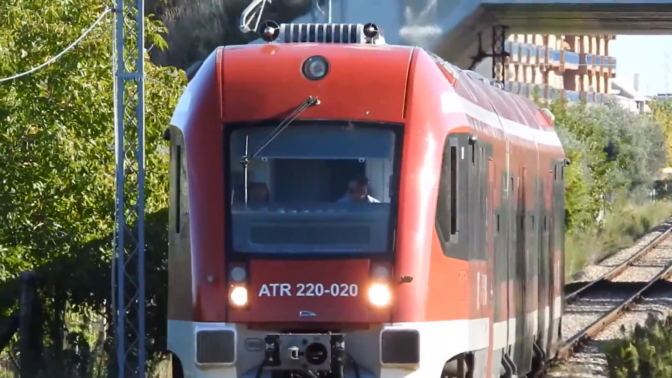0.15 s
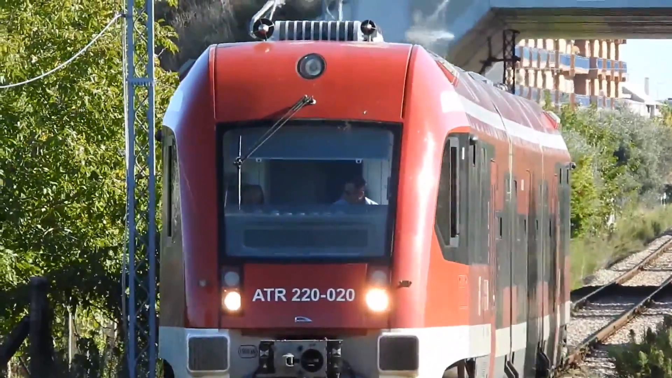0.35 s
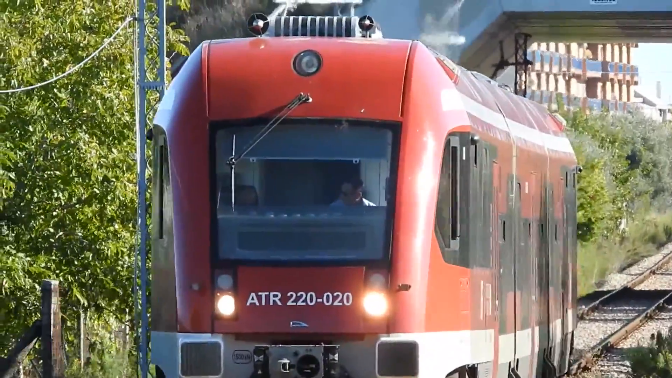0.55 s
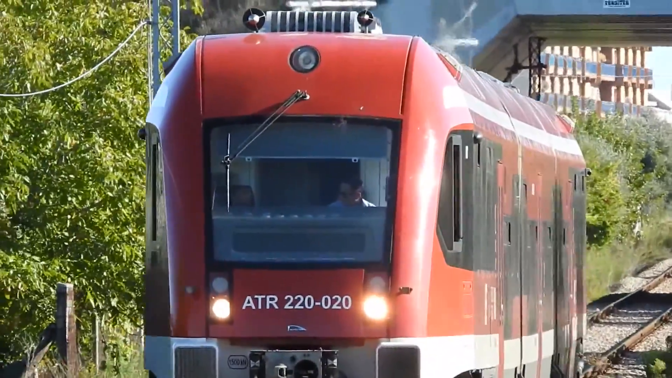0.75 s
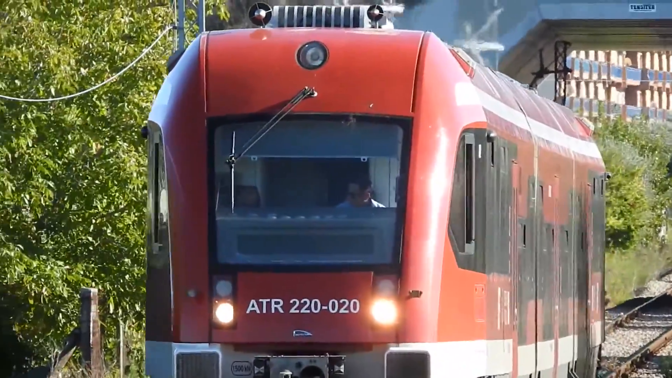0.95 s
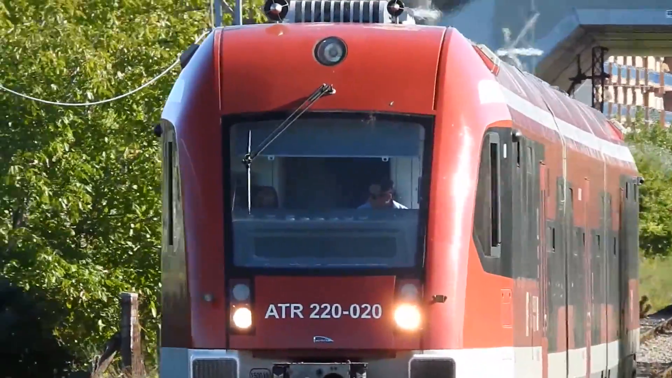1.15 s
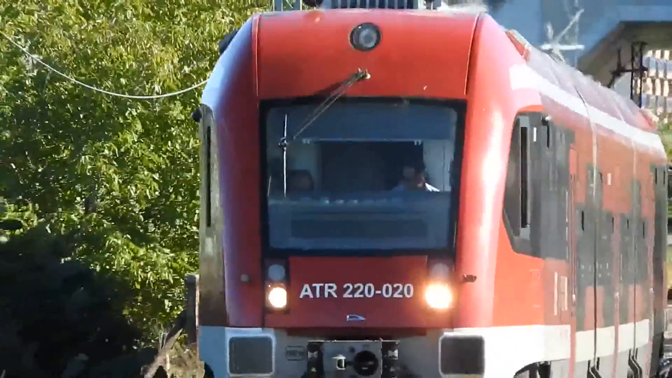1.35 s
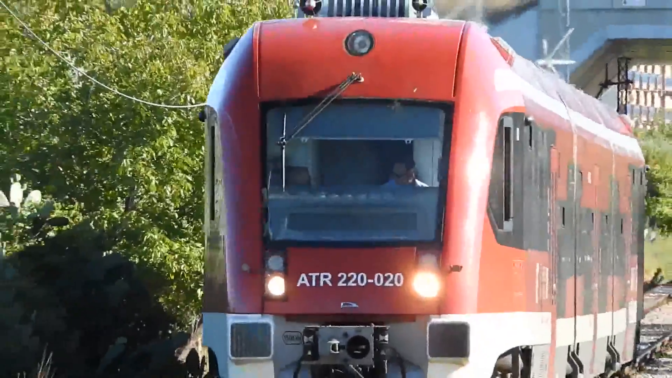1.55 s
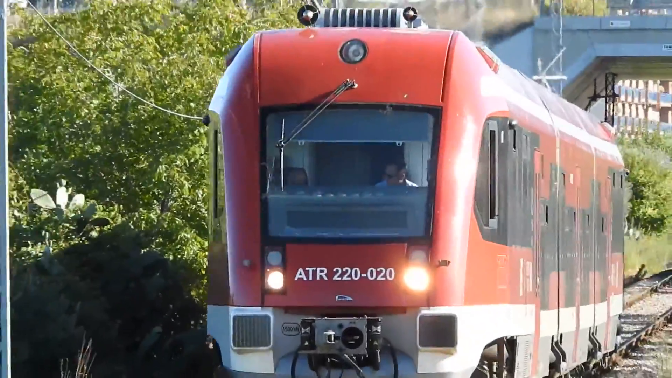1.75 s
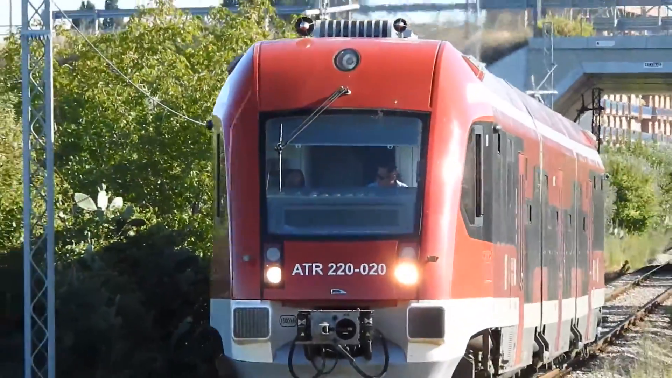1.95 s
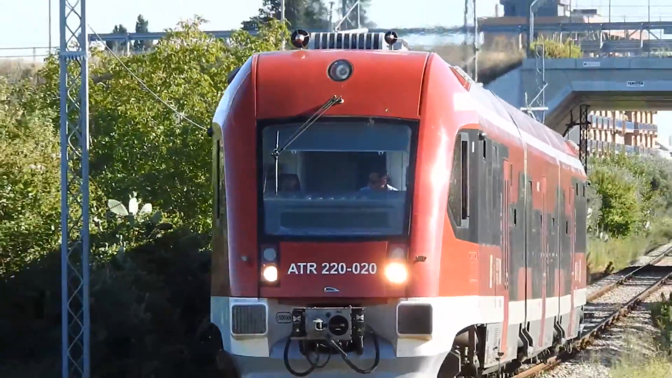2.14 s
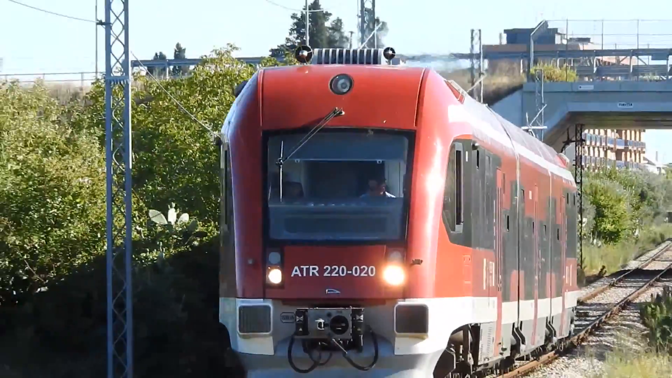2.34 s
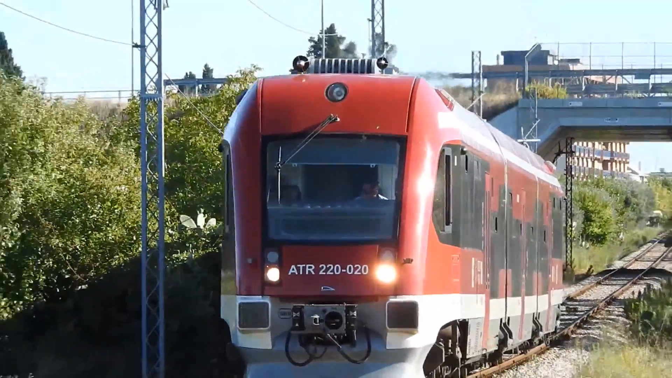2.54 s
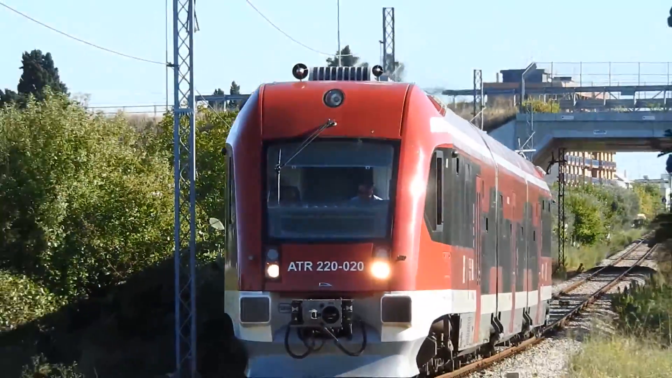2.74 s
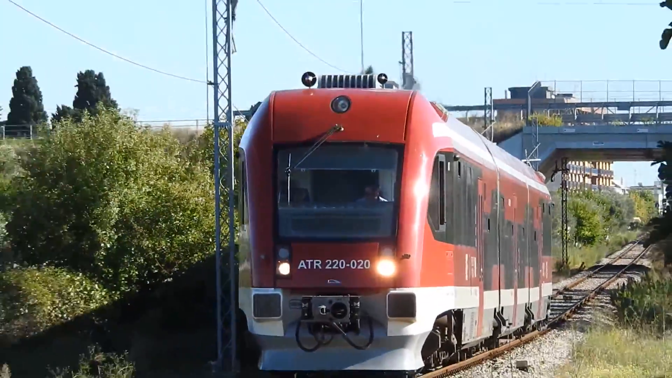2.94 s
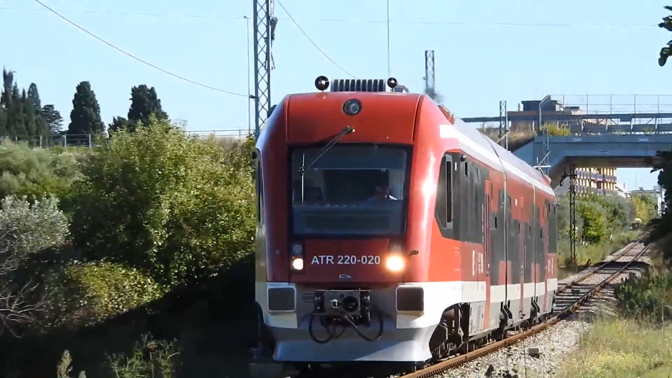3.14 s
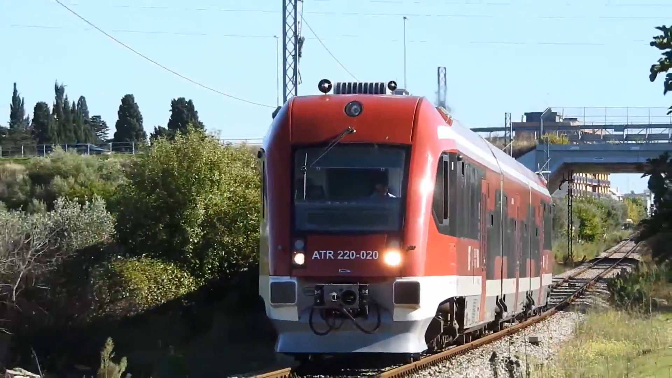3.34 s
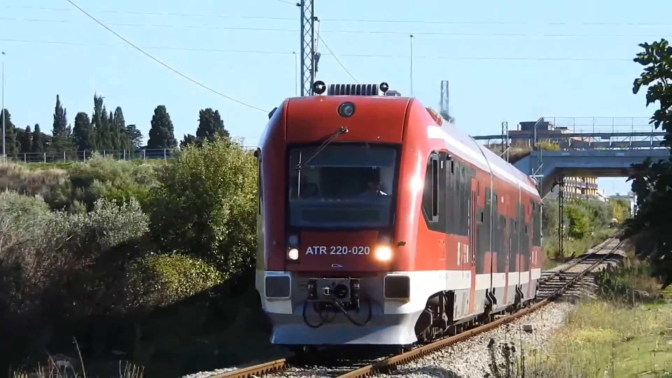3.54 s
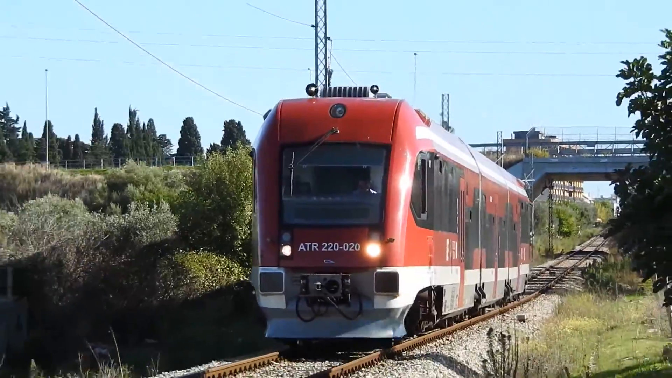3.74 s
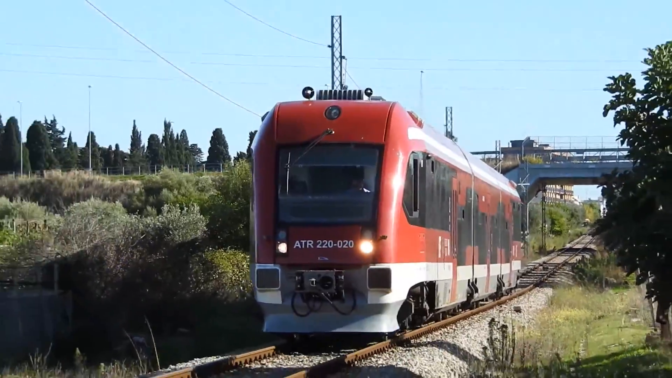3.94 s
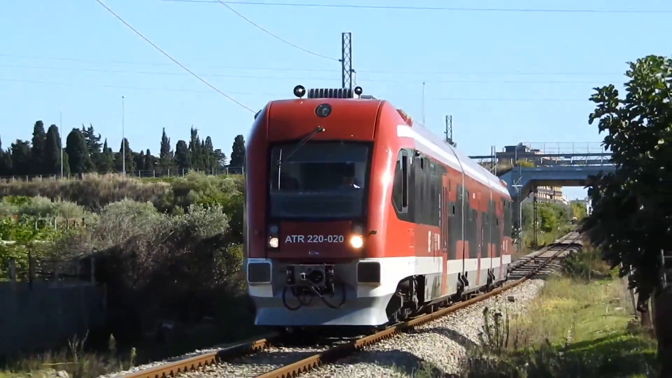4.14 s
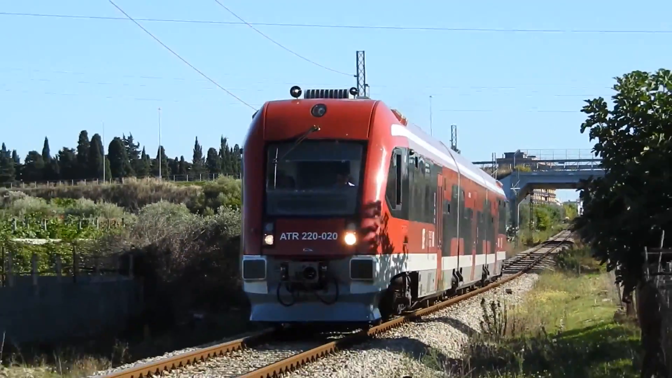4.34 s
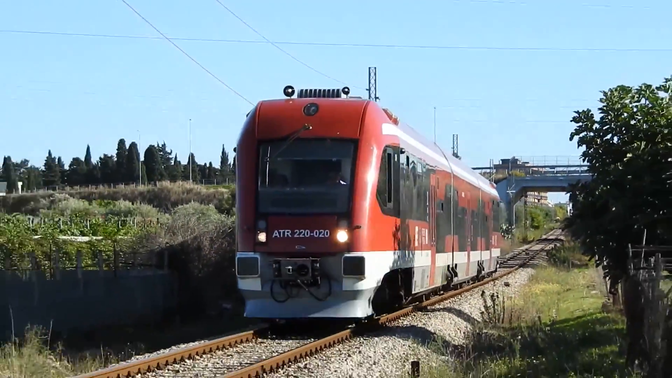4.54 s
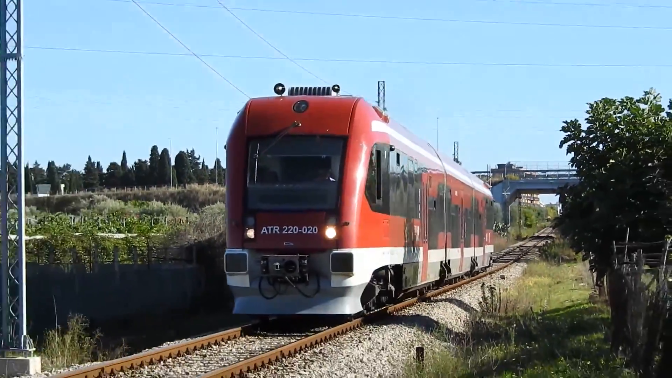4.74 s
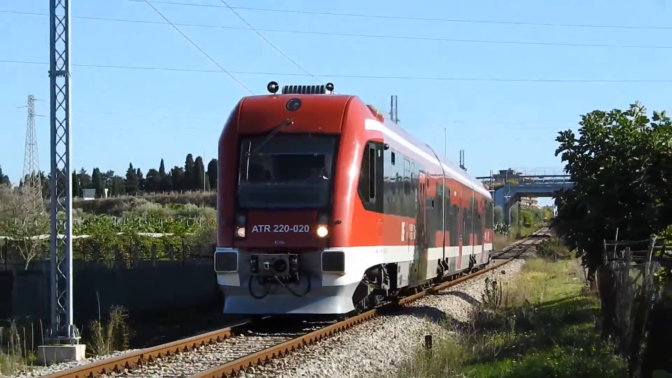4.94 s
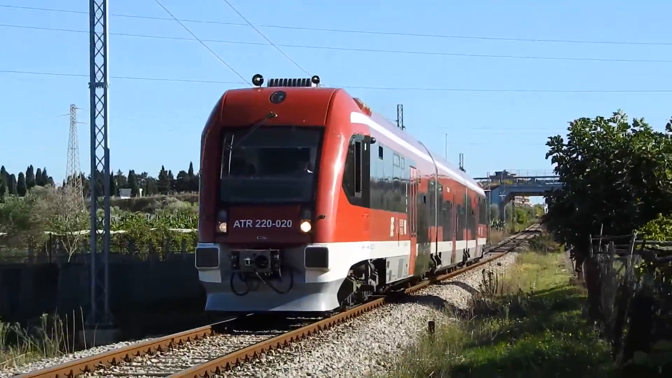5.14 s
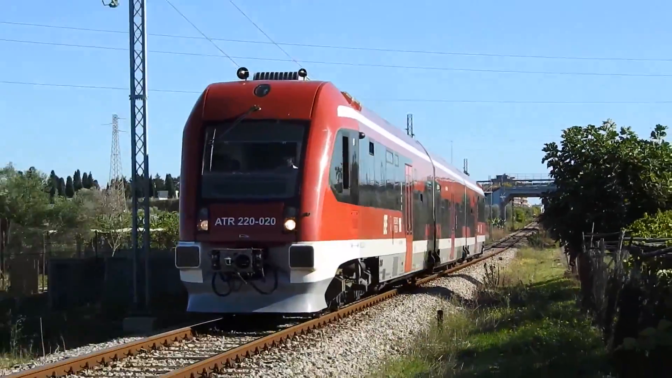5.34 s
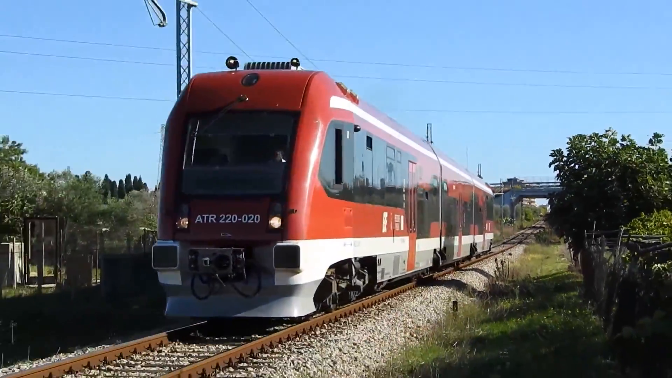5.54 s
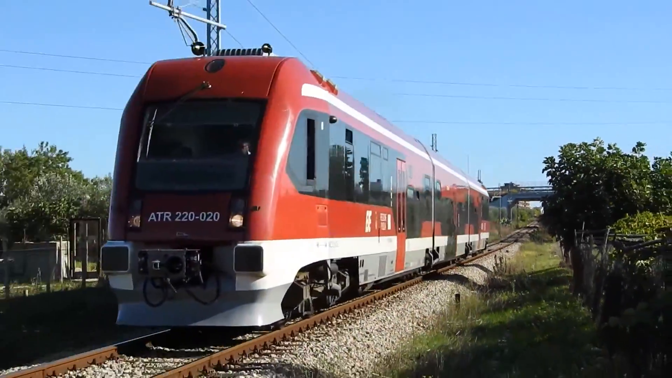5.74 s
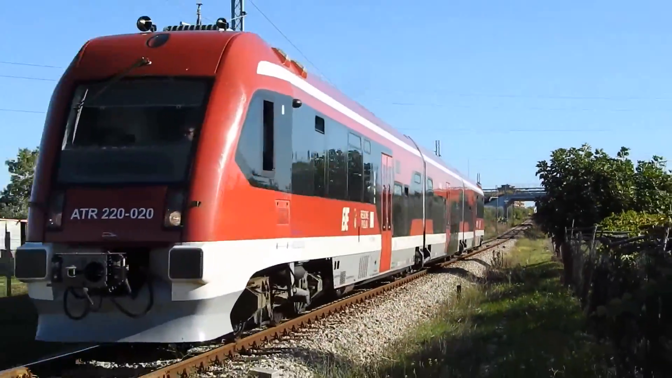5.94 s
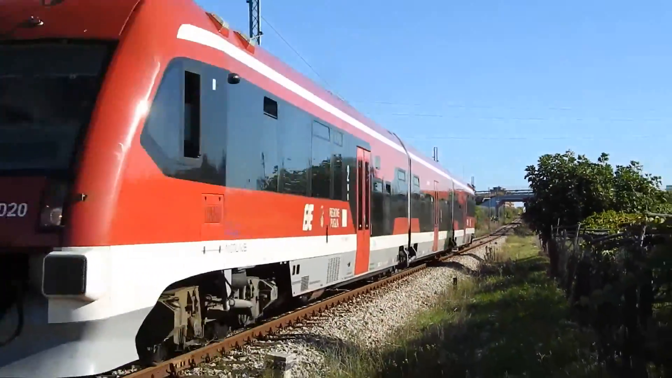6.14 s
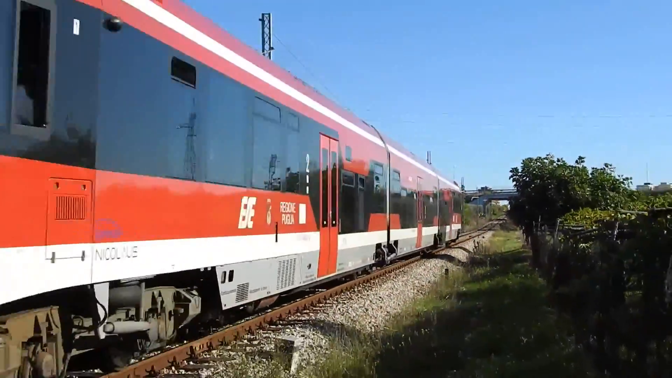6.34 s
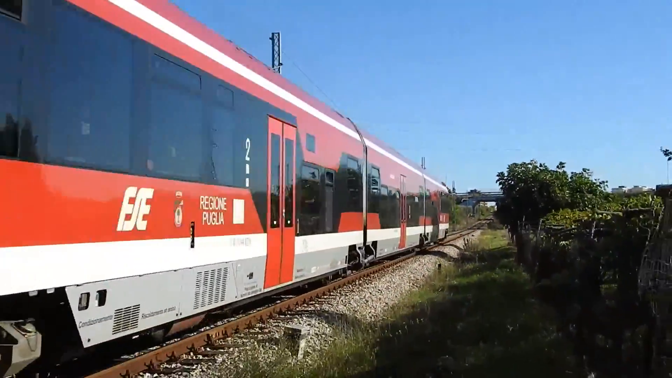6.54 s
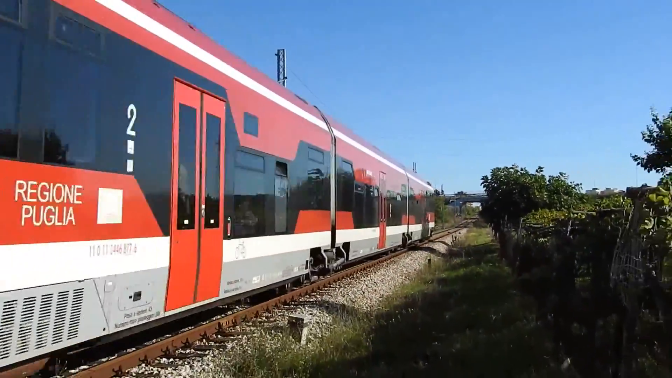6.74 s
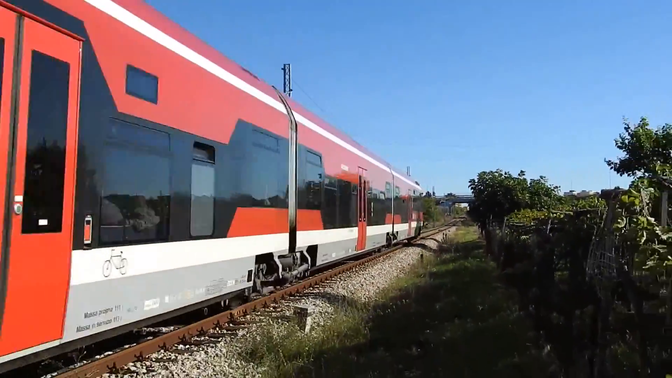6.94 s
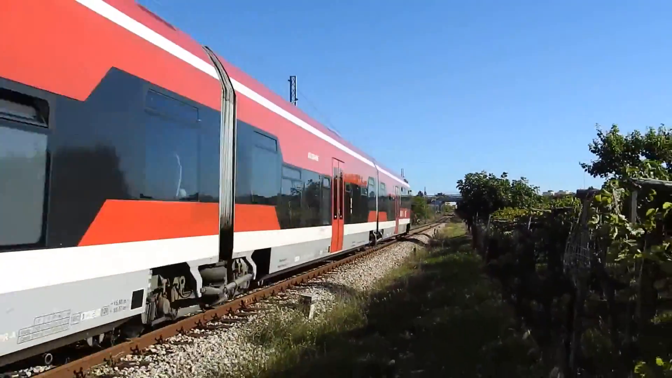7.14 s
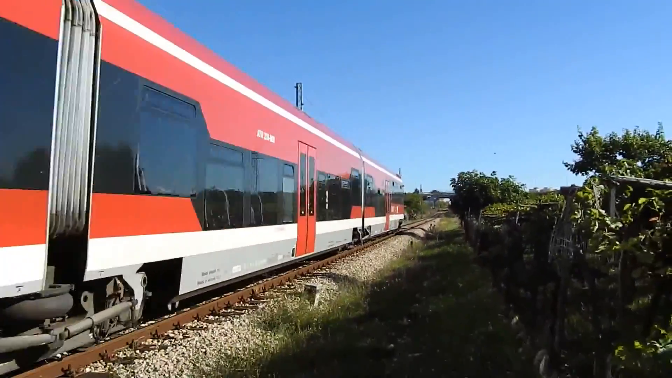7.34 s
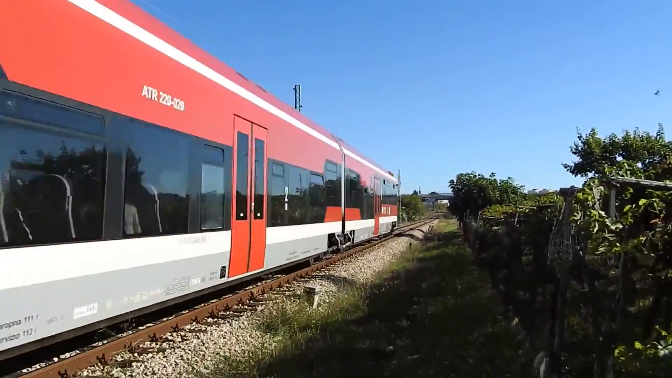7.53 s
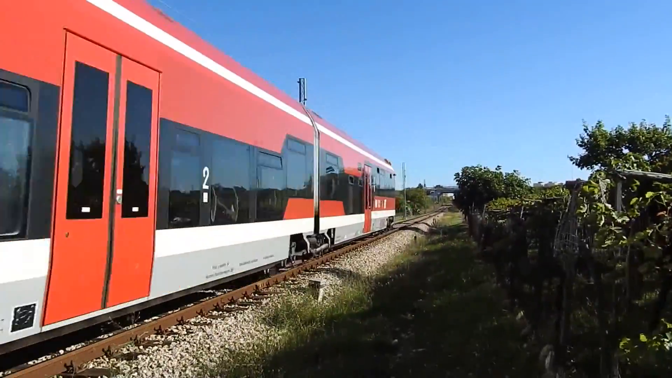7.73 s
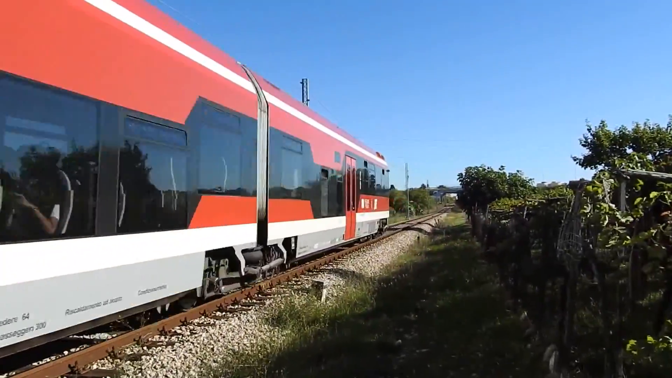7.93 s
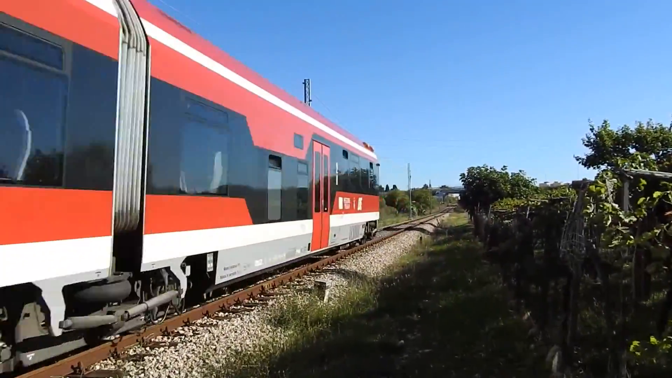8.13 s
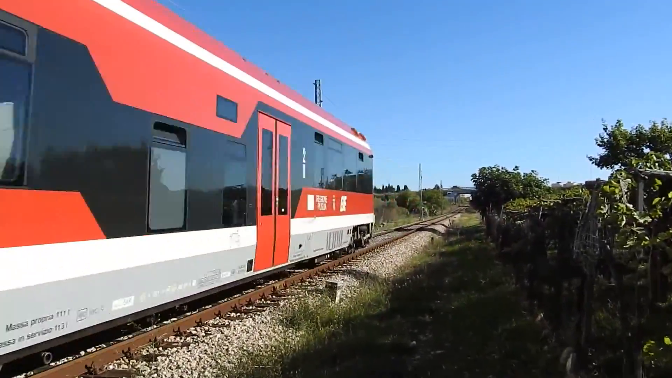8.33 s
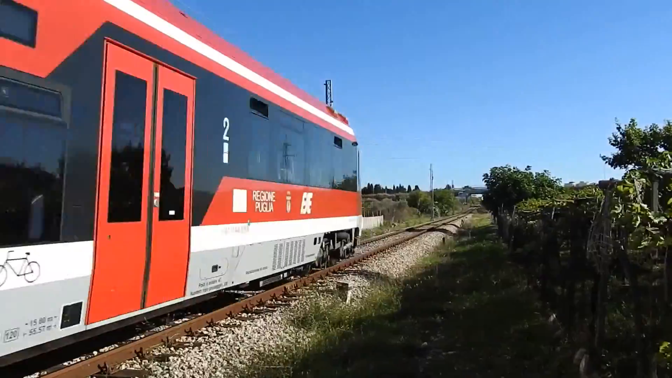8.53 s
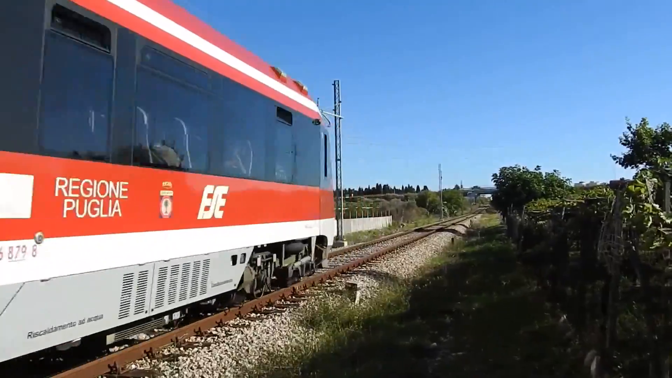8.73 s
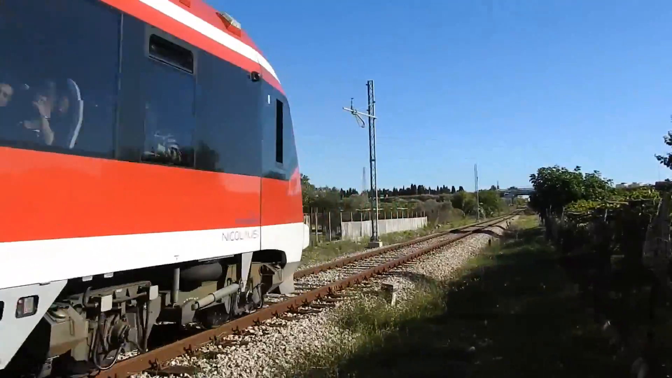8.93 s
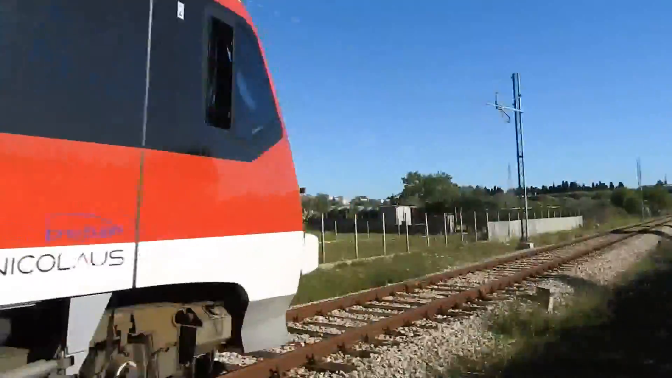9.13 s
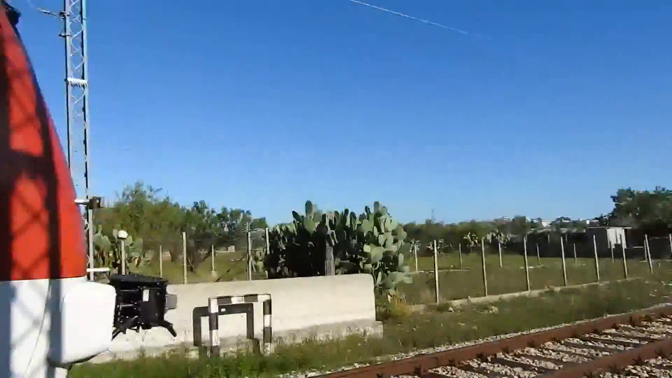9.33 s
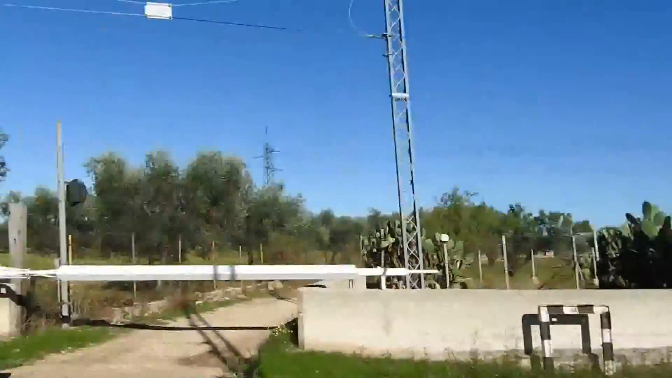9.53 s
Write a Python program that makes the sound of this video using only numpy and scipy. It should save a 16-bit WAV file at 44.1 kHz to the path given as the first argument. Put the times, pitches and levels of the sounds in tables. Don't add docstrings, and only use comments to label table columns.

```python
import sys
import numpy as np
from scipy import signal
from scipy.fft import rfft, irfft, next_fast_len
from scipy.io import wavfile
from scipy.ndimage import uniform_filter1d

SR = 44100
rng = np.random.default_rng(int(sys.argv[2]) if len(sys.argv) > 2 else 0)


def put_to_file(sound):
    columns = np.atleast_2d(sound).T
    safe = np.clip(columns, -1, 1)
    whole_steps = np.round(safe * 32767)
    wavfile.write(sys.argv[1], SR, whole_steps.astype(np.int16))


N = 426888

# start_s, nearness (0-1), how far round to the side (0-1), top_edge_hz of the heard band
APPROACH = [(0, 0, 0.7, 11400), (3.3, 0.18, 0.15, 11550), (4.3, 0.45, 0, 11900), (5, 0.5, 0, 12150),
            (6.2, 0.78, 0, 12200), (6.77, 0.86, 0.38, 12330), (6.95, 1, 0.98, 11700),
            (8.5, 0.84, 0.83, 11460), (9.2, 1, 0.94, 11100), (9.68, 1, 0.9, 10800)]
# start_s, left_minus_right_db
PAN_CURVE = [(0.0, 2.5), (5.72, 1), (6.95, 6), (9.35, 5), (9.68, 8)]


def gain_of(db):
    return np.exp(np.asarray(db) * (np.log(10) / 20))


def evened(x):
    return x / np.sqrt(np.mean(x ** 2) + 1e-20)


def read(points, hz):
    f, value = np.transpose(points)
    return np.interp(np.log(hz + 1), np.log(f + 1), value)


def columns(rows, t):
    s, *values = np.transpose(rows)
    return [np.interp(t, s, v) for v in values]


def resonate(x, hz, width):
    turn = np.exp(2j * np.pi * np.cumsum(hz * np.ones(len(x))) / SR)
    r = np.exp(-np.pi * width / SR)
    return 2 * (turn * signal.lfilter([1 - r], [1, -r], x / turn + 1e-18)).real


def wander(rate_hz):
    t = np.arange(0, N + 256, 256) / SR
    rates = np.geomspace(rate_hz / 8, rate_hz, 24)
    waves = sum(np.sin(2 * np.pi * (f * t + rng.random())) for f in rates)
    return np.interp(np.arange(N) / SR, t, evened(waves))


def add(mix, s, sound):
    part = mix[:, round(s * SR):][:, :sound.shape[1]]
    part += sound[:, :part.shape[1]]


def passing(rows, t, steady_db, axis=0):
    focus = 1.74
    s, reach, *levels = np.transpose(rows)
    swell = (1 + ((t[:, None] - s) / reach) ** 2) ** -focus @ gain_of(2 * levels[axis])
    return 10 * np.log10(swell + gain_of(2 * steady_db))


def bell_bursts(rows, length_s, late_s=0, trim_db=0):
    out, t = np.zeros((2, N)), np.arange(-2500, 2500) / SR
    for s, db, hz in rows:
        pan_db = 1.35 * columns(PAN_CURVE, s)[0]
        sides = gain_of([[pan_db / 2], [-pan_db / 2]])
        bell = np.sin(2 * np.pi * hz * t) * np.exp(-(t / length_s) ** 2 / 2)
        add(out, s + late_s + t[0], gain_of(db + trim_db) * sides / sides.mean() * bell)
    return out


def exhaust():
    # start_s, firing_pitch_hz
    firing_curve = [(0, 92.4), (.5, 93), (3.0, 93), (3.35, 93.7), (3.7, 96.6), (4.05, 100.2), (4.4, 103.1),
                    (4.75, 104.3), (5.4, 105.4), (6.85, 105.2), (7.2, 100.6), (7.5, 95.6), (7.95, 95.8),
                    (8.3, 93.5), (8.6, 98), (8.95, 95.4), (9.3, 87), (9.68, 83)]
    # start_s, level_db
    hum_curve = [(0.0, -42), (0.3, -28.5), (2.3, -31.5), (2.9, -25), (3.5, -23.5), (4.0, -21.5),
                 (4.5, -17.5), (5.0, -13), (6.2, -11), (6.3, -18), (6.75, -25.5), (7.15, -16.5),
                 (7.6, -23.5), (8.2, -25), (8.5, -32.5), (8.9, -25.5), (9.13, -31.5), (9.68, -46)]
    # multiple of the firing pitch, far_db, near_db
    orders = [(.667, -45, -40), (.833, -48, -46), (1.333, -54, -36), (1.5, -55, -38), (1.667, -39.5, -31),
              (2.0, -52, -28), (2.5, -60, -33), (2.75, -58, -42), (4.0, -58, -40), (7.9, -66, -35)]
    # start_s, strength of the weaker one (0-1)
    cancellations = [(3.04, 0.16), (4.1, 0.1), (4.31, 0.5), (4.5, 0.34), (4.71, 0.54), (4.97, 0.35),
                     (5.39, 0.26), (5.95, 0.36), (6.8, 0.18), (7.45, 0.2), (8.11, 0.2), (8.57, 0.4),
                     (8.72, 0.6), (9.22, 0.7), (9.63, 0.4)]
    t = np.arange(N) / SR
    hz, level_db = columns(firing_curve, t) + columns(hum_curve, t)
    near, aside, _ = columns(APPROACH, t)
    cycle = 2 * np.pi * np.cumsum(hz * (1 + 0.0023 * wander(6))) / SR
    weaker, turns = columns([(s, share, k) for k, (s, share) in enumerate(cancellations)], t)
    beating = t > cancellations[0][0] - 0.1
    beat = 1 - np.clip(weaker, 0, 0.9) * np.cos(2 * np.pi * turns) * beating
    tone = gain_of(level_db + 1.4 * wander(17)) * beat * np.cos(cycle)
    for k, far_db, near_db in orders:
        order_db = far_db + near * (near_db - far_db) - 12.0 * aside * near + 1.4 * wander(8)
        tone = tone + gain_of(order_db) * np.cos(k * cycle + k)
    lean_db = 0.86 * near - 0.46
    return np.sqrt(2) * tone * gain_of([[1], [-1]] * lean_db)


def running_gear():
    # start_s, wheels_db, nearest_engine_db
    closeness = [(0, -23.5, -29), (1.3, -22.5, -27), (2.75, -21.5, -23), (3.64, -16, -17), (5, -5.5, -8.5),
                 (5.6, -2, -5.5), (6.1, 2.5, 0), (7.06, -0.5, 0), (7.4, -2, -10.5), (7.8, -2, -17),
                 (8.3, 0.5, -16.5), (8.8, 1.5, -9), (9.35, -0.5, -2.5), (9.68, -4, -8)]
    # start_s, reach_s, level_db
    ground_thumps = [
        (1.3, 0.13, -37),
        (5.4, 0.99, -33),
        (6.14, 0.049, -25),
        (6.25, 0.028, -22),
        (9.0, 0.18, -26.5),
        (9.17, 0.038, -28),
    ]
    # start_s, reach_s, level_db
    panel_drums = [(4.6, 0.96, -31.5), (6.12, 0.023, -19), (6.25, 0.025, -18), (6.54, 0.035, -15),
                   (6.69, 0.14, -17), (7.38, 0.051, -22.5), (7.55, 0.12, -21.5), (7.71, 0.017, -23),
                   (8.33, 0.15, -18), (8.48, 0.03, -18), (9.18, 0.19, -16.5), (9.68, 0.13, -20)]
    # start_s, reach_s, roar_db, hiss_db
    axle_passes = [(1.345, 0.013, -49, -55), (5.5, 0.09, -39, -44), (6.1, 0.087, -29, -41),
                   (6.258, 0.015, -18, -53), (6.69, 0.064, -34, -32.5), (7.04, 0.2, -24, -32.5),
                   (7.7, 0.18, -30.5, -36), (7.92, 0.041, -23.5, -38), (8.5, 0.14, -31.5, -34),
                   (8.76, 0.035, -23.5, -50), (9.19, 0.4, -22, -30.5)]
    # start_s, reach_s, level_db
    louvres = [
        (6.14, .07, -34.5),
        (6.67, .05, -37),
    ]
    # freq_hz, density_db
    rumble_ahead = [(20, -50), (48, -44), (65, -15), (85, 8.5), (125, -6), (160, 3), (210, 2), (250, -35),
                    (330, -62.5)]
    rumble_aside = [(20, -42), (40, -38), (65, -6), (85, 0), (125, -24), (160, 3), (200, -0.5), (250, -24),
                    (330, -70)]
    drum_colour = [(200, -15), (250, -4), (310, -3.5), (345, -1), (385, -1.5), (450, -5.5), (540, -10),
                   (680, -43.5)]
    roll_far = [(280, -38), (480, -10), (714, -5), (820, -6), (1070, -8.5), (1160, -14), (1900, -11),
                (2470, -37), (4180, -120)]
    roll_near = [(280, -36), (480, -8), (545, -27), (601, 1.5), (702, -2), (839, -5), (1200, -6),
                 (1390, -8), (1900, -33), (2470, -31), (4180, -120)]
    roll_aside = [(280, -43), (480, -17), (554, 0), (770, -5), (1130, -8), (1530, -16.5), (1900, -33),
                  (2470, -49), (4180, -120)]
    hiss_far = [(880, -22), (1500, -2.5), (2090, -1.5), (2290, -4.5), (2500, -3.5), (2860, -2.5),
                (3530, -5), (4040, -3.5), (4990, -10.5), (7600, -11.5), (9880, -63), (16700, -120)]
    hiss_near = [(880, -2), (1500, 0), (2010, -2), (2460, -1.5), (3550, -5.5), (4040, -3.5), (7600, -10.5),
                 (9880, -40), (16700, -120)]
    rush_far = [(4240, -14), (7200, -0.5), (8210, -6), (9260, -4), (10400, 0), (10900, -3.5), (11500, -12),
                (12500, -28), (16200, -52), (22000, -120)]
    rush_near = [(5500, -5.5), (7200, -3), (8500, 0.5), (9500, 1.5), (11000, -0.5), (13000, 9)]
    # pitch_hz, width_hz,
    # far_db, near_db
    whine_lines = [(829, 35, 0, 6), (940, 80, 5, 5), (1300, 28, 9, 0), (2250, 32, 11, 1), (2480, 200, 1, 5),
                   (2680, 35, 6, 2), (2920, 50, 3, 0), (3970, 60, 5.5, 1), (6630, 55, 8, 1),
                   (8850, 70, 6.5, 0), (10120, 60, 5, 0), (10600, 130, 4, 4), (11010, 40, 4, 0)]
    # start_s, reach_s, pitch_hz, over_hiss_db
    web_songs = [
        (7.35, .05, 2650, 5),
        (7.87, .06, 2400, 7),
        (8.37, .06, 3350, 5),
        (8.5, .08, 4150, 4),
        (8.72, .09, 2350, 6),
        (8.87, .05, 2400, 7),
        (9.18, .08, 2350, 3.5),
        (9.2, .07, 2700, 4.5),
        (9.35, .09, 3100, 7),
        (9.5, .07, 3080, 7),
    ]
    # freq_hz, coherence (negative = out of step)
    likeness_ahead = [(60, 0.92), (270, 0.92), (580, 1), (1700, 0.89), (2400, 0.74), (4400, 0.78),
                      (6800, 0.49), (8600, 0.53), (12000, 0.4)]
    likeness_aside = [(60, 1), (270, 0.94), (1000, 0.88), (2400, 0.54), (4400, 0.51), (6500, 0.1),
                      (8300, 0.52), (12000, 0.51)]
    # freq_hz, share of the pan
    pan_share = [(60, 0), (150, 0.098), (350, 1.34), (1150, 1.36), (4000, 1.46), (12000, 0.37)]
    # freq_hz, left_lead_rad
    side_lead = [(1000, .05), (3200, .65), (3700, .6), (4130, -.3), (5940, -.9), (7320, -3), (12000, -3.1)]

    frames, hz = N // 256 + 5, np.fft.rfftfreq(1024, 1 / SR)
    t = np.arange(frames) * 256 / SR
    wheels, engine = columns(closeness, t)
    pan_db = columns(PAN_CURVE, t)[0]
    near, aside, _ = columns(APPROACH, t)

    rumble_db = passing(ground_thumps, t, -26.5 + 0.76 * wheels)
    drum_db = passing(panel_drums, t, -25 + 1.59 * wheels)
    roll_db = passing(axle_passes, t, -28 + wheels)
    bay_power = gain_of(2 * (-34 + 0.71 * engine)) + gain_of(2 * (-39.5 + wheels))
    hiss_db = passing(axle_passes, t, 10 * np.log10(bay_power), axis=1)
    rush_db = passing(louvres, t, -36 + engine)

    def blend(far, close, nearness=near):
        return read(far, hz)[:, None] * (1 - nearness) + read(close, hz)[:, None] * nearness

    def layer(colour_db, level_db, lo_hz, hi_hz):
        power = gain_of(2 * colour_db)
        return power / power[(hz > lo_hz) & (hz < hi_hz)].sum(0) * gain_of(2 * level_db)

    a, b, c, d, patches = rng.standard_normal((frames, 513, 5)).T
    patches = evened(uniform_filter1d(uniform_filter1d(patches, 8, 0), 10, 1))
    flicker = evened(uniform_filter1d(rng.standard_normal(frames), 6))
    roll_colour = blend(roll_far, roll_near) * (1 - aside) + read(roll_aside, hz)[:, None] * aside
    power = (layer(blend(rumble_ahead, rumble_aside, aside), rumble_db - 0.5, 125, 230)
             + layer(read(drum_colour, hz)[:, None], drum_db - 0.5 + 1.34 * flicker, 240, 500)
             + layer(roll_colour, roll_db - 0.5 + flicker, 550, 2300)
             + layer(blend(hiss_far, hiss_near), hiss_db + 0.38 * flicker, 1550, 8400)
             + layer(blend(rush_far, rush_near), rush_db - 0.5 + 0.5 * flicker, 8520, 10440))

    before_lens = t < 1.3
    f, width, far, close = np.transpose(whine_lines)
    heard = np.where(before_lens & (f < 10000)[:, None], 0.25, 1)
    heard = heard * (1 - aside * near)
    line_db = (far[:, None] + near * (close - far)[:, None]) * heard
    whine_db = 1 / (1 + ((hz[:, None] - f) / width) ** 2) @ line_db
    rise_hz_per_s, width_hz = 700, 90
    for s, reach, centre_hz, db in web_songs:
        off = (hz[:, None] - centre_hz - rise_hz_per_s * (t - s)) / width_hz
        whine_db = whine_db + db * np.exp(-((t - s) / reach) ** 2) / (1 + off ** 2)
    lens_db = -2.2 * before_lens * (hz > 1000)[:, None]
    size = np.sqrt(power) * gain_of(0.68 * patches + whine_db + lens_db)

    lead = read(side_lead, hz)[:, None] * np.clip(2 * aside * near, 0, 1)
    same = np.clip(blend(likeness_ahead, likeness_aside, aside), -1, 1)
    lean = gain_of(read(pan_share, hz)[:, None] * pan_db / 2)
    left = a + 1j * b
    right = same * left + np.sqrt(1 - same ** 2) * (c + 1j * d)
    pair = np.array([left * lean, right / lean * np.exp(-1j * lead)])
    mid = np.sqrt((lean ** 2 + lean ** -2 + 2 * same * np.cos(lead)) / 4)
    return gain_of(1.0) * signal.istft(pair * size / mid, nperseg=1024, noverlap=768)[1][:, :N]


def wind_gusts():
    # start_s, reach_s, level_db
    gust_swells = [
        (.4, 0.1, -54),
        (1.3, 0.13, -44),
        (2.6, 0.1, -35.5),
        (2.9, 0.19, -33),
        (3.6, 0.23, -42),
        (4.15, 0.29, -44),
    ]
    band = signal.butter(2, [40, 220], "bandpass", fs=SR, output="sos")
    gusts = [evened(signal.sosfilt(band, v)) * gain_of(4.8 * wander(25))
             for v in rng.standard_normal((2, N))]
    hop = 32
    swell_db = passing(gust_swells, np.arange(0, N, hop) / SR, -59)
    swell = np.repeat(gain_of(swell_db), hop)[:N]
    a, b = rng.standard_normal((2, N))
    low = signal.butter(2, [25, 52], "bandpass", fs=SR, output="sos")
    sway = gain_of(-40) * evened(signal.sosfilt(low, [a + 0.8 * b, a - 0.6 * b]))
    return sway + swell * np.array(gusts) * gain_of([[-4], [3]])


def wind_bumps():
    # start_s, peak_db, pitch_hz
    right_bumps = [(.247, -22, 147), (.371, -22, 149), (.909, -30, 148), (1.18, -25, 150),
                   (1.298, -18, 163), (2.482, -13, 139), (2.524, -17.5, 171), (2.567, -10.5, 166),
                   (2.599, -15, 187), (2.73, -8.5, 112), (2.751, -11, 154), (2.786, -13, 150),
                   (2.812, -6.5, 153), (2.861, -15, 158), (2.91, -14.5, 181), (2.942, -12, 163),
                   (3.009, -9.5, 163), (3.1, -9.5, 154), (3.532, -28, 149), (3.656, -10, 138),
                   (4.011, -15, 167), (4.158, -11, 152)]
    left_bumps = [(1.341, -21.5, 214), (1.7, -23, 160), (1.9, -28.5, 250), (2.591, -14, 195),
                  (2.66, -24, 354), (3.1, -31, 254), (2.627, -15, 149), (3.509, -12, 157),
                  (4.199, -17, 150)]
    length_s, leak_db, one_way_push = 0.0046, -22, 0.39
    out, t = np.zeros((2, N)), np.arange(-2500, 2500) / SR
    for rows, sides_db in ((right_bumps, [[leak_db], [0]]), (left_bumps, [[0], [leak_db]])):
        for s, db, hz in rows:
            bump = (np.cos(2 * np.pi * hz * t) + one_way_push) * np.exp(-(t / length_s) ** 2 / 2)
            add(out, s + t[0], gain_of(db) * gain_of(sides_db) * bump)
    return out


def finger_rustles():
    # start_s, peak_db, pitch_hz
    ticks = [(1.283, -30, 1400), (1.285, -30, 2900), (1.292, -37, 2800), (1.296, -36, 5200),
             (1.31, -34, 3000), (1.319, -31, 2200), (1.321, -30, 1000), (1.331, -23, 650),
             (1.334, -23, 1050), (1.3363, -20, 1200), (1.337, -27, 2300), (1.338, -40, 8500),
             (1.343, -24, 950), (1.346, -30, 4600), (1.355, -28, 1200)]
    out, t = np.zeros((2, N)), np.arange(900) / SR
    for (s, db, hz), noise in zip(ticks, rng.standard_normal((len(ticks), 900))):
        scrape = evened(resonate(resonate(noise, hz, 0.49 * hz), hz, 0.51 * hz))
        tick = scrape * np.minimum(t / 0.0019, 1) * gain_of(db - 8.5 - 60 * t / 0.019)
        add(out, s, tick * np.ones((2, 1)))
    return out


def chirps():
    # start_s, level_db, pitch_hz
    notes_heard = [
        (2.805, -51, 5800),
        (2.855, -48, 5800),
        (5.772, -29.5, 2880),
        (5.776, -37, 2600),
        (6.045, -27, 2460),
    ]
    out, t = np.zeros((2, N)), np.arange(1100) / SR
    for (s, db, hz), noise in zip(notes_heard, rng.standard_normal((len(notes_heard), 1100))):
        note = evened(resonate(resonate(noise, hz * (1.04 - 4.7 * t), 450), hz * (1.04 - 5.1 * t), 450))
        add(out, s, gain_of(db) * note * np.hanning(len(t)) * np.ones((2, 1)))
    return out


def turbochargers():
    # start_s, pitch_hz, tone_db, air_db
    whistles = [
        [(3.8, 11250, -68, -69), (5.5, 11880, -56, -58), (6.15, 11790, -45, -48), (6.75, 11750, -44, -44),
         (7.04, 11620, -45, -34.5), (7.19, 11180, -45, -33.5), (7.4, 10680, -51, -49), (7.9, 10550, -55, -58),
         (8.2, 10100, -58, -63)],
        [(8.4, 11300, -70, -54), (8.7, 10700, -58, -39), (9.0, 10200, -54, -36.5), (9.2, 9400, -54, -38),
         (9.4, 8600, -60, -41), (9.68, 7750, -54, -45)],
    ]
    out = np.zeros((2, N))
    for rows, air_width_hz in zip(whistles, (480, 900)):
        t = np.arange(rows[0][0], rows[-1][0], 1 / SR)
        hz, tone_db, air_db = columns(rows, t)

        def whistle(tone_noise, air_noise):
            tone = evened(resonate(resonate(tone_noise, hz, 60), hz, 60))
            air = resonate(resonate(air_noise, hz * 0.945, air_width_hz), hz * 0.98, air_width_hz)
            return gain_of(tone_db) * tone + gain_of(air_db) * evened(air)

        a, b, c, d = rng.standard_normal((4, len(t)))
        left, other = whistle(a, b), whistle(c, d)
        same = np.clip(0.7 - columns(APPROACH, t)[1], -1, 1)
        pair = np.array([left, same * left + np.sqrt(1 - same ** 2) * other])
        add(out, t[0], pair * signal.windows.tukey(len(t), 0.1))
    return out


def web_flutters():
    # start_s, peak_db, pitch_hz
    flutter_notes = [(5.14, -28.5, 910), (5.36, -27, 852), (5.51, -23.5, 822), (5.63, -22, 825),
                     (5.74, -26, 908), (5.83, -23, 828), (5.9, -31, 815), (5.96, -20, 835),
                     (6.01, -22, 943), (6.06, -26, 840), (6.13, -18, 794)]
    return bell_bursts(flutter_notes, 0.014)


def axle_clacks():
    # start_s, peak_db
    hard_hits = [
        (5.535, -26),
        (6.2402, -4.5),
        (6.25, -3.5),
        (6.269, -11),
    ]
    out, t = np.zeros((2, N)), np.arange(-200, 200) / SR
    push = (1 - (t / 0.0006) ** 2) * np.exp(-(t / 0.0004) ** 2 / 2)
    edge = 0.07 * np.sinc(2 * 15700 * t)
    for s, db in hard_hits:
        add(out, s + t[0], gain_of(db) * (push + edge) * gain_of([[1.5], [-1.5]]))
    return out


def joint_knocks():
    # start_s, peak_db, ring_hz, t60_s
    leading_blow = (6.2335, 4, 960, .03)
    joint_blows = [(5.939, -6.5, 823, 0.15), (6.248, 3, 567, 0.14), (6.267, -13, 790, 0.036),
                   (6.366, 2, 870, 0.021), (6.524, -4, 574, 0.033), (6.666, -16, 325, 0.057),
                   (6.694, -8, 294, 0.05), (7.078, 1.5, 590, 0.028), (7.9, -5, 555, 0.033),
                   (8.03, -8, 965, 0.038), (8.222, -19, 315.4, 0.063), (8.515, -19, 620, 0.03),
                   (8.733, -5, 910, 0.039), (8.848, -6, 670, 0.055), (8.993, -1.5, 406, 0.099)]
    blows = [leading_blow, *joint_blows]
    out, t = np.zeros((2, N)), np.arange(5000) / SR
    rise = np.sin(np.pi / 2 * np.minimum(t / 0.003, 1)) ** 2
    for (s, db, hz, t60), noise in zip(blows, rng.standard_normal((len(blows), 5000))):
        pan_db = columns(PAN_CURVE, s)[0]
        ring = np.sin(2 * np.pi * hz * t) * gain_of(-60 * t / t60)
        grit = evened(resonate(resonate(noise, 1300, 900), 1300, 900))
        crack = (np.sin(2 * np.pi * 1030 * t) + 0.21 * grit) * gain_of(-60 * t / 0.057)
        blow = rise * (ring + 0.6 * crack)
        add(out, s, gain_of(db - 8.5) * blow * gain_of([[pan_db / 2], [-pan_db / 2]]))
    return out


def floor_booms():
    # start_s, peak_db, pitch_hz
    panel_booms = [(5.992, -19.5, 353), (6.149, -15, 325), (6.12, -16, 255), (6.152, -10.5, 215),
                   (6.245, -12.5, 290), (8.2, -21, 208), (8.32, -15.5, 229), (6.535, -15, 352),
                   (6.612, -19, 332), (6.638, -14, 290), (6.676, -7.5, 300), (6.77, -12, 385),
                   (7.5, -14.5, 192), (7.35, -19, 350), (7.395, -16, 305), (7.68, -16, 390),
                   (8.315, -20, 263), (7.526, -16.5, 410), (7.717, -14.5, 325), (8.224, -12, 305),
                   (8.298, -12, 347), (8.348, -20, 408), (8.404, -16, 366), (8.452, -20, 352),
                   (8.525, -11, 362), (8.57, -17, 192), (9.11, -16, 210), (9.375, -14.5, 189),
                   (9.002, -13, 360), (9.058, -14.5, 353), (9.102, -14, 366), (9.137, -10, 320),
                   (9.202, -7.5, 383), (9.249, -11, 392), (9.29, -20, 318), (9.378, -14.5, 382)]
    return bell_bursts(panel_booms, 0.0099)


def loose_clunks():
    # start_s, peak_db, pitch_hz
    gear_clunks = [(6.43, -15, 540), (6.475, -15, 560), (6.694, -21, 519), (6.757, -20, 646),
                   (6.808, -17, 605), (6.942, -19, 829), (7.026, -21, 860), (7.082, -15, 535),
                   (7.332, -22, 645), (7.425, -20, 684), (7.577, -18.5, 657), (7.853, -24, 865),
                   (7.906, -12, 570), (8.014, -17.5, 950), (8.176, -19, 654), (8.34, -13, 545),
                   (8.399, -18, 610), (8.518, -12, 605), (8.735, -17, 557), (8.849, -16, 684),
                   (8.945, -17, 890), (9.004, -14, 555), (9.064, -19, 610), (9.2, -13, 560)]
    return bell_bursts(gear_clunks, 0.00401, late_s=0.00401, trim_db=-3)


def bogie_thuds():
    # start_s, peak_db, pitch_hz
    hard_thuds = [
        (6.520, -6, 390),
        (6.527, -3, 350),
        (6.700, -5, 420),
    ]
    return bell_bursts(hard_thuds, 0.0024)


def scene():
    air = wind_gusts() + wind_bumps() + finger_rustles() + chirps()
    blows = web_flutters() + joint_knocks() + floor_booms() + loose_clunks() + bogie_thuds()
    return exhaust() + running_gear() + air + turbochargers() + blows


def camera_input(dry):
    # freq_hz, echo share (0-1)
    ring_share = [(2900, 0.027), (3400, 0.28), (3700, 0.59), (3960, 0.96), (4070, 0.024)]
    # freq_hz, left_lead_rad
    port_lead = [(50, .42), (100, .32), (180, .22), (350, .14), (1000, 0)]
    echo_s, echo_hz = 1 / 98.5, 3898
    size = next_fast_len(N + 4096)
    hz = np.fft.rfftfreq(size, 1 / SR)
    share = read(ring_share, hz)
    comb = (1 + share * np.exp(-2j * np.pi * (hz - echo_hz) * echo_s)) / np.sqrt(1 + share ** 2)
    low_cut = hz ** 2 / np.hypot(hz ** 2, 46.0 ** 2) * np.exp(1j * read(port_lead, hz) * [[0.5], [-0.5]])
    return irfft(rfft(dry, size) * comb * low_cut, size)[:, :N].clip(-0.9, 0.9)


def ragged_top(x):
    hz, t, z = signal.stft(x, SR, nperseg=1024)
    near, _, edge_hz = columns(APPROACH, t)
    edge_hz = edge_hz + 110 * np.repeat(rng.standard_normal(len(t)), 2)[:len(t)]
    below_edge = (hz[:, None] < edge_hz) * gain_of(-3.5 * (hz > 11950))[:, None]
    overload = gain_of(-18) * (abs(t - 6.25) < 0.016) * (hz[:, None] < 15700)
    z = z * np.maximum(below_edge, overload)
    quiet = 0.85 * np.clip((4 - t) / 2.4, 0, 1)
    last_engine = 0.95 * np.exp(-((t - 9.3) / 0.13) ** 2 - ((hz[:, None] - 11800) / 1200) ** 2)
    tiles = np.kron(rng.random((len(hz) // 8 + 1, len(t) // 2 + 1)), np.ones((8, 2)))
    stray = tiles[:len(hz), :len(t)] < quiet + last_engine
    a, b = rng.standard_normal((2, *z.shape))
    z = z + (a + 1j * b) * stray * (hz[:, None] > edge_hz) * gain_of(-94 + 19 * near)
    return signal.istft(z, SR, nperseg=1024)[1][:, :N]


def limiter(x):
    # start_s, drop_db, recovery_s
    catches = [
        (5.535, 2, 0.71),
        (6.239, 7.5, 0.16),
        (6.28, 3, 0.043),
        (6.699, 5, 0.031),
        (8.543, -1.5, 0.032),
    ]
    t = np.arange(N) / SR
    drop_db = sum(db * np.clip((t - s) / 0.0062, 0, 1) * np.exp(-np.maximum(t - s, 0) / back)
                  for s, db, back in catches)
    return x * gain_of(-drop_db)


def roll_off(x):
    return signal.sosfilt(signal.butter(12, 15700, fs=SR, output="sos"), x)


def record(dry):
    ducked = limiter(ragged_top(camera_input(dry))) + axle_clacks()
    high_pass = signal.butter(2, 30, "highpass", fs=SR, output="sos")
    finished = np.clip(signal.sosfiltfilt(high_pass, ducked), -1, 1)
    return roll_off(finished)


dry = scene()
out = record(dry)
put_to_file(out)
```